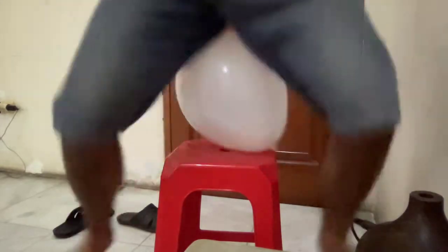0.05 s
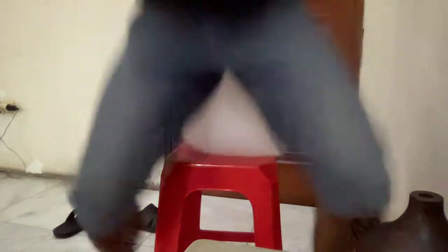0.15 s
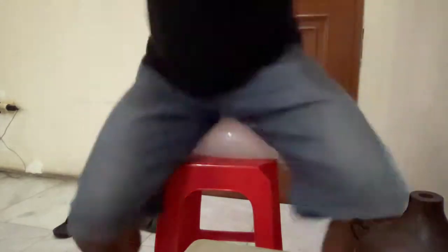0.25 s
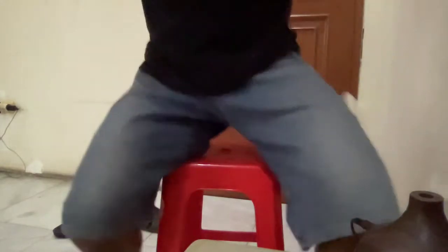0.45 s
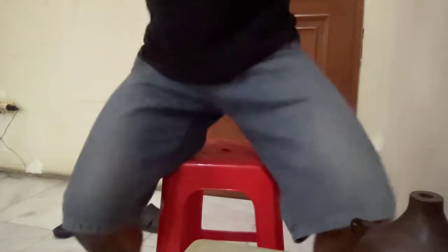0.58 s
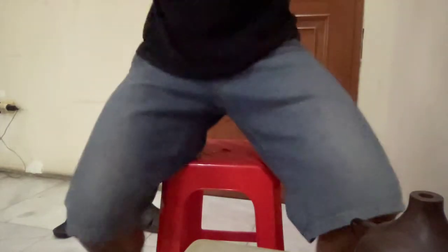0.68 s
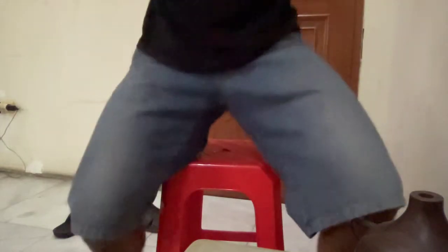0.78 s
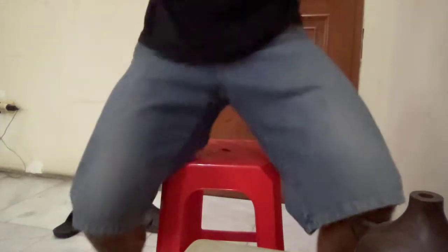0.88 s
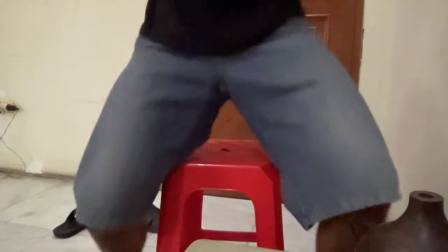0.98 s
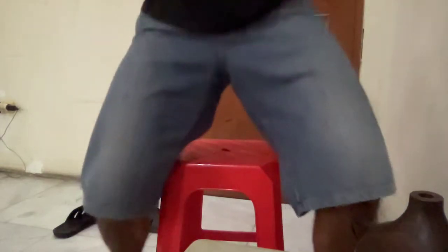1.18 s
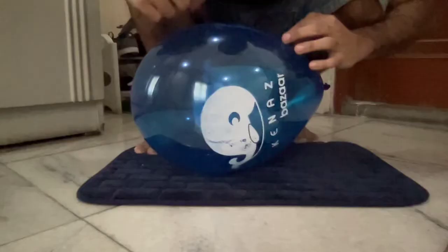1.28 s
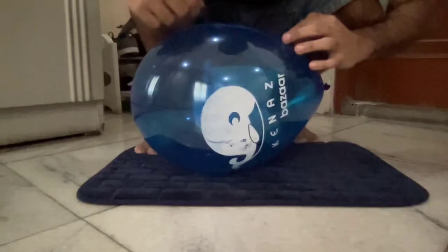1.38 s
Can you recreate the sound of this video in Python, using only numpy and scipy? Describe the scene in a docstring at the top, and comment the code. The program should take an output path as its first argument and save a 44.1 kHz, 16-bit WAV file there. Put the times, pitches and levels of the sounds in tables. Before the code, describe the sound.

A balloon squeaks and bursts under someone's weight, a loud bang echoing in a tiled room.

```python
"""A tiled room, one microphone. Someone sits down hard on a balloon on a plastic stool: the rubber
squeaks and rubs, thumps against the seat, then tears with a crack. The tiles throw back dense echoes
and standing waves ring on. Bang and room overload the microphone for almost half a second.
Near the end the sound cuts out briefly, and the ambience of the next scene begins."""
import sys
import numpy as np
from scipy import signal
from scipy.fft import rfft, irfft
from scipy.io import wavfile

SR = 44100
rng = np.random.default_rng(int(sys.argv[2]) if len(sys.argv) > 2 else 0)


def bounce(signal):
    """Save signal as a 16-bit WAV file at the path given by the first command-line argument."""
    frames = np.transpose(np.atleast_2d(signal))
    limited = np.clip(frames, -1, 1)
    pcm = np.round(limited * 32767).astype(np.int16)
    wavfile.write(sys.argv[1], SR, pcm)


N = 63945
BURST_S = 0.333
SILENCE_START_S, SILENCE_END_S = 1.3195, 1.4305

# Spectrum of tearing rubber. Each row: frequency in Hz, relative level in dB per octave.
CRACK_SPECTRUM = [(200, -9), (1000, 4.5), (6000, -11), (16000, -8)]


def undb(db):
    """Decibels to gain."""
    return 10 ** (np.asarray(db) / 20)


def since(start):
    """Seconds since a moment, zero before it."""
    return np.maximum(np.arange(N) / SR - start, 0)


def envelope(start, rise, t60):
    """A smooth rise and a decay of 60 dB in t60; all times in seconds."""
    t = since(start)
    return (1 - np.exp(-t / max(rise, 1e-5))) * np.exp(-np.log(1000) * t / t60)


def ring(start, hz, db, t60, rise=0.001, phase_turns=0):
    """One vibrating mode: a fading sine."""
    return undb(db) * envelope(start, rise, t60) * np.sin(2 * np.pi * (hz * since(start) + phase_turns))


def lookup(table, hz, column=1):
    """Read one column of a table along log frequency."""
    rows = np.array(table, float)
    return np.interp(np.log(hz), np.log(rows[:, 0]), rows[:, column])


def noise(spectrum):
    """Noise with the given level per octave, rolled off below 20 Hz."""
    hz = np.maximum(np.arange(N // 2 + 1) * SR / N, 1)
    pink = np.sqrt(SR / 2 / hz / np.log(2))
    gain = undb(lookup(spectrum, hz)) * pink / np.sqrt(1 + (20 / hz) ** 8)
    return irfft(rfft(rng.standard_normal(N)) * gain, N)


def flicker(rate_hz, depth_db):
    """Random gain with a mean power of about one."""
    wander = np.interp(since(0) * rate_hz, np.arange(N), rng.standard_normal(N))
    spread = np.log(undb(depth_db))
    return np.exp(spread * wander * np.sqrt(3 / 2) - spread ** 2)


def background():
    """Room tone until the sound cuts out; then a different ambience with a faint high ring begins."""
    # Each row of all three spectra: frequency in Hz, level in dB per octave.
    room_tone = [(25, -56.5), (50, -53.5), (110, -49), (200, -48.5), (400, -42), (750, -54.5), (1500, -54),
                 (3000, -63.5), (6000, -69.5), (10000, -70), (15000, -78.5)]
    next_scene_ambience = [(30, -65), (80, -47), (220, -43), (500, -47.5), (950, -50.5), (1400, -56.5),
                           (1750, -49), (2200, -61), (6000, -74), (15000, -81)]
    shuffle = [(30, -50.5), (100, -36), (400, -47), (800, -54), (1500, -51), (3000, -56), (6000, -65),
               (15000, -62.5)]
    fade_s = 0.2  # the sitter's shuffling dies away after the burst
    room = noise(room_tone) + noise(shuffle) * np.exp(-since(BURST_S) / fade_s)
    return np.where(since(SILENCE_END_S) > 0, noise(next_scene_ambience), room)


def rubbing():
    """The balloon's skin squeaks once, then rubs on cloth and plastic in small grainy slips."""
    # Each row: start in seconds, gain in dB, rise and t60 in seconds, treble tilt in dB per octave.
    slips = [(.13, -56, 0.0034, 0.1, 0), (.153, -44, 0.009, .1, 0), (.203, -32.5, 0.0016, .06, -2),
             (.214, -29, 0.0012, 0.076, 0.5), (.231, -33.5, .002, 0.049, 2.5), (0.241, -30, .002, .16, -2),
             (0.257, -36.5, 0.0011, 0.44, 1)]
    # Each row: frequency in Hz, relative level in dB per octave.
    friction_spectrum = [(300, -2.5), (900, 0.5), (1800, 3), (3500, 3), (7000, -2.5), (15000, -1)]
    pivot_hz = 3000
    out = ring(start=0.128, hz=2950, db=-41, t60=0.04)  # the squeak
    for start, db, rise, t60, tilt in slips:
        colour = [(hz, level + tilt * np.log2(hz / pivot_hz)) for hz, level in friction_spectrum]
        friction = noise(colour) * flicker(rate_hz=693, depth_db=1.5)
        out += undb(db) * envelope(start, rise, t60) * friction
    return out


def squash():
    """Taking the sitter's weight, the balloon thumps the stool, knocks it once hard and stirs the room."""
    # Each row: start in seconds, pitch in Hz, level in dB, t60 in seconds.
    thumps = [(0.131, 208, -25.5, .08), (0.153, 193, -16.5, .13), (.182, 74.2, -18, 0.16),
              (0.206, 182.4, -14.5, .07), (0.2172, 375, 3.5, 0.03), (0.223, 199.4, -12, 0.15),
              (0.287, 207.3, -11, 0.065), (0.3236, 281.4, -5, 0.048), (0.3307, 344, 3.5, 0.034)]
    # Each row: frequency in Hz, relative level in dB, t60 in seconds.
    stool_modes = [(475, -12, .06), (576, -13.5, .06), (865, -13, .04), (1020, -18, .04),
                   (1179, -14, 0.025), (1603, -20.5, .05)]
    # The room's answer to the thumps. Each row: frequency in Hz, relative level in dB per octave.
    reverb_spectrum = [(40, -22), (120, -0.5), (400, -1), (700, -7.5), (1500, -20.5), (3000, -21.5),
                       (16000, -40.5)]
    knock_s, knock_db, reverb_db = 0.2172, 1.5, -20.5
    direct = sum(ring(start, hz, db, t60) for start, hz, db, t60 in thumps)
    knock = sum(ring(knock_s, hz, db + knock_db, t60, phase_turns=rng.random())
                for hz, db, t60 in stool_modes)
    reverb_power = sum((undb(db) * envelope(start, rise=0.001, t60=0.56)) ** 2
                       for start, _, db, _ in thumps)
    return direct + knock + undb(reverb_db) * np.sqrt(reverb_power) * noise(reverb_spectrum)


def burst():
    """The rubber cracks; echoes off the tiles lose their treble first, and standing waves ring on."""
    # Reverberation. Each row: frequency in Hz, starting level in dB per octave, t60 in seconds.
    echo_bands = [(35, -15, 1.4), (83, 1.5, 0.81), (180, 10, 0.81), (303, 13.5, 0.86), (443, 23, 0.71),
                  (582, 18.5, .8), (700, 10, 0.79), (1000, 12, 0.79), (1580, 6, 0.81), (2920, 6, 0.74),
                  (5700, 11.5, 0.67), (9900, 6.5, 0.56), (12500, 3.5, 0.58), (15500, 2, .36)]
    # Standing waves. Each row: frequency in Hz, level in dB, t60 in seconds.
    room_modes = [(157, 3.5, 0.98), (206.84, 3.5, 1.04), (272.1, 9, 0.91), (314.4, 9, 0.96),
                  (372.5, 13.5, 1.063), (411.7, 9, .88), (467, 13, 0.67), (495.9, 11.5, .8),
                  (579.6, 6, 0.66), (591.2, 1, 1.065), (674.8, 6, 0.66), (817, 4, 0.7), (980.6, -1.5, 0.94),
                  (1139, -7.5, 1.1)]
    bunch_above_hz, bunch_fade_s = 1500, 0.12  # early treble echoes arrive in bunches
    echo_spectrum = rfft(noise(echo_bands))
    octave = np.log2(np.maximum(np.arange(N // 2 + 1) * SR / N, 20))
    bunches = flicker(rate_hz=259.9, depth_db=6.5 * np.exp(-since(BURST_S) / bunch_fade_s))
    # The crack, straight from balloon to microphone.
    out = undb(18.5) * noise(CRACK_SPECTRUM) * envelope(BURST_S + 0.0022, rise=0, t60=0.019)
    for centre in np.arange(4, 15, 0.5):  # half-octave bands, each with its own decay
        band = irfft(echo_spectrum * np.maximum(1 - 2 * abs(octave - centre), 0), N)
        band *= envelope(BURST_S, rise=0.0013, t60=lookup(echo_bands, 2 ** centre, column=2))
        out += band * (bunches if 2 ** centre > bunch_above_hz else 1)
    for hz, db, t60 in room_modes:  # each takes a few trips across the room to form
        out += ring(BURST_S, hz, db, t60, rise=0.041, phase_turns=rng.random())
    return out


def snaps():
    """Short bright snaps crackle through the dense reverberation."""
    # Each row: start in seconds, gain in dB.
    snap_events = [(0.35, 16), (.364, 11.5), (0.378, 13), (.394, 16), (.433, 12), (0.448, 9.5),
                   (0.468, 9.5), (0.501, 6.5), (.517, 13)]
    pulses = sum(undb(db) * envelope(start, rise=0.0019, t60=0.028) for start, db in snap_events)
    return noise(CRACK_SPECTRUM) * pulses


def scene():
    """Everything that reaches the one microphone."""
    return (burst() + squash() + background() + rubbing() + snaps())[None]


def record(dry):
    """The microphone overloads and clips, the sound cuts out for a moment, and the top treble is lost."""
    ceiling, knee_sharpness, top_hz = 0.7, 21, 15820
    drive = np.abs(dry) / ceiling
    clipped = dry / (1 + drive ** knee_sharpness) ** (1 / knee_sharpness)
    live = (since(SILENCE_START_S) == 0) | (since(SILENCE_END_S) > 0)
    low_pass = signal.firwin(255, top_hz, fs=SR, window=("kaiser", 7))
    return signal.fftconvolve(clipped * live, low_pass[None], mode="same")


dry = scene()
out = record(dry)
bounce(out)
```